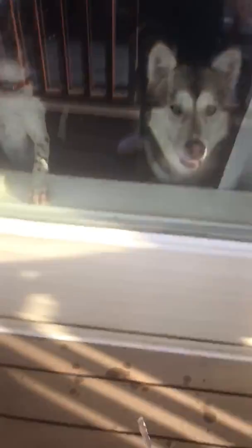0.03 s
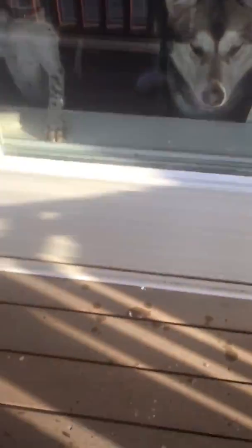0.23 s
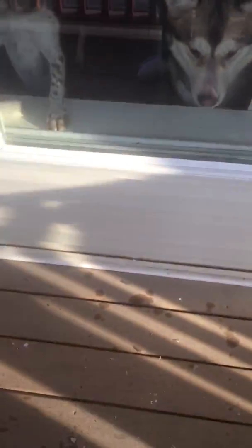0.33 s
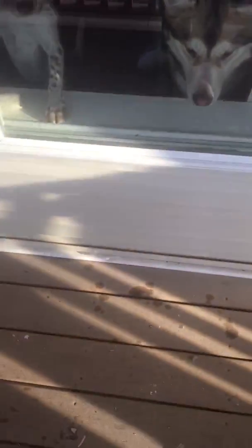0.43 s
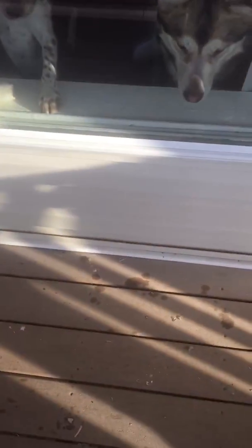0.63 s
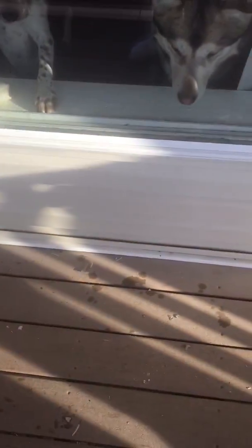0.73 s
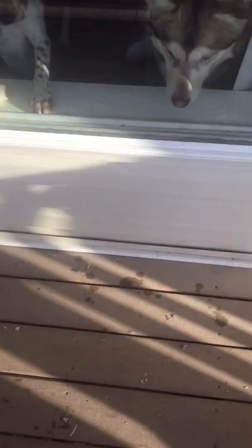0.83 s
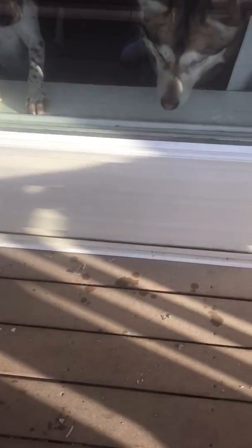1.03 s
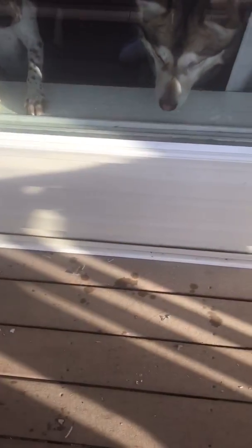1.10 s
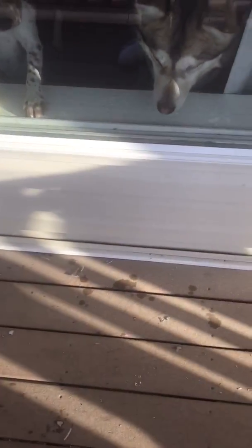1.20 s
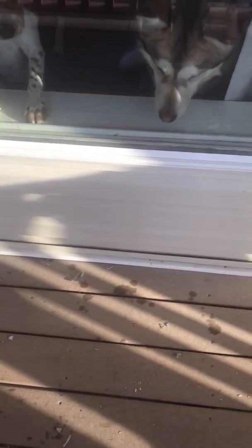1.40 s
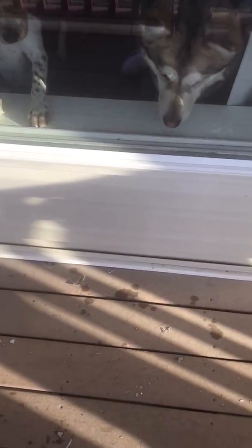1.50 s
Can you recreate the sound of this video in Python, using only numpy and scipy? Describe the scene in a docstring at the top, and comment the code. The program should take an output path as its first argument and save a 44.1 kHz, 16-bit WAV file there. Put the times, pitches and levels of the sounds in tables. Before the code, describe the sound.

An icicle hits a wooden deck and bursts in quick, sharp cracks as the boards thud. The biggest piece clinks, bounces and rolls to rest among skittering crumbs, heard close by in quiet outdoor air beside a house.

```python
"""On a wooden deck beside a house, an icicle hits the boards and bursts in a quick run of cracks.
The boards thud and tiny shards ping. The biggest piece lands again with a hollow clink, bounces
and rolls to rest among skittering crumbs. The boards and the house wall throw the sound of the ice
back over a quiet outdoor background with a few faint rustles."""
import sys
import numpy as np
from scipy import signal
from scipy.fft import rfft, irfft
from scipy.io import wavfile

SR = 44100
rng = np.random.default_rng(int(sys.argv[2]) if len(sys.argv) > 2 else 0)


def generate_wav(signal):
    """Clip the signal to [-1, 1] and save it as 16-bit WAV at the path in sys.argv[1]."""
    frames = np.transpose(np.atleast_2d(signal))
    scaled = np.clip(frames, -1, 1) * 32767
    pcm = np.round(scaled).astype(np.int16)
    wavfile.write(sys.argv[1], SR, pcm)


N = 68355
T = np.arange(N) / SR


def icicle_cracks():
    """Ice breaks on the boards: each blow is a sharp click and a short crunch, with its own tone."""
    # Each row: start in seconds, then level in dB in six bands (thud, knock, clack, crack, tick, fizz).
    blows = [ (0.2149, -28, -22.5, -26.5, -26.5, -28.5, -21),
             (0.2211, -32, -28.5, -34.5, -25, -30.5, -27.5), (0.2253, -33, -26, -28.5, -34, -25, -41),
             (0.2312, -40.5, -25, -52, -24, -46, -52), (0.249, -40.5, -40, -39, -29, -43, -45),
             (0.2582, -37, -50, -42, -35.5, -28.5, -25.5), (0.2649, -42, -29, -26, -32, -36, -39),
             (.2745, -38.5, -31.5, -30, -22.5, -27, -32.5), (0.2759, -45, -31, -33, -27, -28.5, -36.5),
             (0.2816, -35, -34.5, -31, -28, -34, -42), (0.293, -52.5, -49.5, -36, -44, -31.5, -41.5),
             (.3285, -42, -58, -47, -42, -49, -54), (0.344, -63.5, -53, -45, -38, -51.5, -51),
             (.3755, -43.5, -42.5, -44, -49, -51, -54.5), (0.3975, -42, -37.5, -36.5, -28, -29.5, -43.5),
             (0.405, -47, -46, -30, -47, -40, -51), (.4186, -32, -39, -39, -38.5, -31.5, -41.5),
             (.4722, -51, -56, -56, -47, -55, -60), (.4990, -59, -63, -63, -68, -52, -53.5),
             (.5238, -61, -75, -66, -52, -46.5, -55.5), (0.5775, -44, -29.5, -33.5, -48.5, -45.5, -58),
             (.5812, -53, -33, -46, -37, -53, -72), (0.5963, -44.5, -40, -50.5, -45, -52, -67),
             (0.6274, -52, -46, -37.5, -39.5, -53, -64), (.6470, -58, -56, -56, -55, -57.5, -74),
             (0.6683, -65, -63, -56, -55, -58, -69), (0.7258, -57.5, -54, -48.5, -46.5, -64, -80),
             (0.759, -55.5, -55, -62.5, -69, -70, -80.5), (.7930, -58.5, -60.5, -55.5, -63, -73, -78),
             (.8275, -62.5, -58, -58, -62, -77.5, -82), (0.8854, -59.5, -50.5, -64.5, -71, -80, -87)]
    # The borders of those six bands in Hz, from low to high.
    band_edges = [100, 550, 1400, 2500, 5000, 10000, 16000]
    edges = np.array(band_edges)
    centres = np.sqrt(edges[1:] * edges[:-1])
    blow_s, crunch_share = .005, .66  # the rest of a blow's energy goes into the click
    band_offset_db = 10 * np.log10(blow_s * SR * SR / 2 / np.diff(edges))  # spreads energy over each band
    cracks = 0
    for start, *levels in blows:
        contact = np.sqrt(crunch_share) * unit(rng.standard_normal(N) * fade(.019))
        contact[0] = np.sqrt(1 - crunch_share)
        db = np.array(levels) + band_offset_db
        thud = [(40, db[0] - 24), (110, db[0] - 11), (centres[0], db[0]), (500, db[0] - 1.5)]
        tone = [*thud, (660, db[1] - 3.5), *zip(centres[1:], db[1:])]
        cracks = cracks + at(through(contact, colour(tone)), start)
    return cracks


def big_piece_clinks():
    """The biggest piece rings each time it lands, more weakly each time; the second clink is dullest."""
    # Each row: start in seconds, strength in dB, pitch in Hz above which the ringing is weakened.
    landings = [(.4192, 1, 6000), (.5778, -15, 1000), (0.6271, -38, 5030)]
    # Each row: pitch in Hz, relative level in dB, fade time in seconds.
    notes = [(670, -36.5, .025), (857, -21, .022), (1050, -11.5, .012), (1150, -16, 0.025),
             (1197, -40.5, .12), (1830, -35.5, .11), (1900, -8.5, 0.016), (1953, -32.5, 0.12),
             (3010, -32.5, .12), (3148, -11, .013), (3265, -35.5, 0.098), (3985, -44, .14),
             (4200, -9, 0.0094), (6180, -16.5, 0.016)]
    rise = 1 - np.exp(-T / .00061)
    clinks = 0
    for start, strength, hardness_hz in landings:
        ringing = sum(ring(hz, db + strength, fade_s) / np.hypot(1, hz / hardness_hz)
                      for hz, db, fade_s in notes)
        clinks = clinks + at(ringing * rise, start)
    # The piece is too small to give off low notes.
    return signal.sosfilt(signal.butter(3, 560, "high", fs=SR, output="sos"), clinks)


def deck_thuds():
    """The boards take up the heavy blows and boom."""
    # Each row: pitch in Hz, relative level in dB, fade time in seconds.
    notes = [(78, -47, 0.1957), (156, -39.5, .3), (221.4, -36, .22), (277, -34, 0.22), (334, -33, .06),
             (400, -41, .15), (856, -37, .1), (995, -38, 0.17)]
    # Each row: start in seconds, strength in dB.
    blows = [(0.2163, 4.5), (0.4196, -14.5), (0.58, -15)]
    rise = 1 - np.exp(-T / .003)
    boom = sum(ring(*note) for note in notes) * rise
    return sum(at(amp(db) * boom, start) for start, db in blows)


def shard_pings():
    """Splinters give short, very high pings; being uneven, each rings at two close pitches."""
    # Each row: start in seconds, pitch in Hz, level in dB, fade time in seconds.
    pings = [(.2315, 12600, -11, 0.013), (.2590, 13000, -23, .012), (0.332, 12600, -43, .03),
             (0.377, 12360, -45, 0.045), (0.4341, 13950, -31.5, .025), (.6100, 13900, -53, 0.034),
             (.6490, 12900, -60, 0.037), (.7760, 14000, -62, .02)]
    twin_ratio, twin_db = 1.027, -8.5
    return sum(at(ring(hz, db, fade_s) + ring(hz * twin_ratio, db + twin_db, fade_s), start)
               for start, hz, db, fade_s in pings)


def crumb_spray():
    """A spray of ice crumbs ticks on the boards, ever weaker."""
    # Each row: time in seconds, level in dB.
    loudness = [(.222, -40), (.29, -46), (.32, -52.5), (.45, -61.5), (.55, -67), (.82, -68.5)]
    # Each row: frequency in Hz, relative level in dB.
    tone = [(1000, -11.5), (3000, -0.5), (6000, -1), (10000, -3), (13000, 2), (16000, -7.5)]
    flying = (T > .222) & (T < .83)
    ticks = patter(per_second=610, scatter_db=2) * level_curve(loudness) * flying
    return through(ticks, unit(colour(tone)))


def big_piece_roll():
    """The biggest piece rolls to rest in small dull bumps."""
    # Each row: frequency in Hz, relative level in dB.
    tone = [(120, -9), (300, 2), (1000, -1), (1900, -5), (3500, -22), (7000, -32), (16000, -50)]
    rolling = (T > .62) & (T < .9)
    bumps = patter(per_second=700, scatter_db=2) * rolling
    return amp(-59) * through(bumps, unit(colour(tone)))


def rustles():
    """A few faint, bright rustles, and a duller shuffle near the end."""
    # Each row: time of the peak in seconds, rough half-length in seconds, level in dB.
    bursts = [(0.983, .014, -75), (1.256, .01, -72.5), (1.281, .011, -66), (1.398, 0.013, -74.5),
              (1.475, 0.01, -66.5), (1.498, 0.02, -65.5)]
    # Each row: frequency in Hz, relative level in dB.
    rustle_tone = [(1000, -8), (4000, -6), (8000, 1), (10500, -4.5), (13000, 2.5), (16000, -6)]
    # Each row: time in seconds, level in dB.
    shuffle_loudness = [(1.3, -85), (1.38, -73.5), (1.402, -59), (1.43, -70.5), (1.48, -67), (1.55, -65)]
    # Each row: frequency in Hz, relative level in dB.
    shuffle_tone = [(60, 3), (150, -5.5), (600, 9), (1000, 5.5), (1800, 2), (4300, -6), (7000, -15),
                    (16000, -33)]
    rustle_level = sum(amp(db) * np.exp(-((T - peak) / width) ** 2) for peak, width, db in bursts)
    shuffle_level = level_curve(shuffle_loudness) * (T > shuffle_loudness[0][0])
    grains = patter(per_second=5000, scatter_db=4.5)
    bright = through(grains * rustle_level, unit(colour(rustle_tone)))
    dull = through(grains * shuffle_level, unit(colour(shuffle_tone)))
    return bright + dull


def add_echoes(sound):
    """The wall slaps the sound back; boards and wall add dense early echoes and a weak, longer tail."""
    # Each row: frequency in Hz, early level in dB, its fade in seconds, tail in dB, its fade in seconds.
    bands = [(200, -0.5, 0.11, -10, .7), (900, -5.5, 0.12, -18.5, 0.8), (1900, -5, .14, -17, 0.37),
             (3500, -7.5, 0.16, -20, 0.42), (7000, -11, .13, -21, .45), (13000, -10.5, 0.11, -22.5, .4)]
    wall_s, wall_db, first_echo_s = .012, -16.5, .005
    log_hz = np.log(np.maximum(np.arange(N // 2 + 1) * SR / N, 1))
    centres = np.log([row[0] for row in bands])
    early, tail = rfft(rng.standard_normal((2, N)))
    echoes = 0
    for pick, (_, early_db, early_s, tail_db, tail_s) in zip(np.eye(len(bands)), bands):
        band = np.interp(log_hz, centres, pick)  # one at this band, zero at its neighbours
        echoes = echoes + amp(early_db) * irfft(early * band, N) * unit(fade(early_s))
        echoes = echoes + amp(tail_db) * irfft(tail * band, N) * unit(fade(tail_s))
    return sound + amp(wall_db) * at(sound, wall_s) + at(through(sound, echoes), first_echo_s)


def outdoor_air():
    """A low, quiet outdoor rumble that swells and sinks a little."""
    # Each row: frequency in Hz, relative level in dB.
    tone = [(18, -28.5), (32, -11.5), (48, 0.5), (82, -14.5), (175, -8.5), (300, -9.5), (420, -10),
            (600, -16.5), (1070, -20), (1700, -28.5), (4000, -35.5), (12000, -40.5), (16000, -42.5)]
    level_db, swell_db = -61, 1.4
    swell = np.interp(T, np.linspace(0, T[-1], num=16), rng.standard_normal(16))
    response = unit(colour(tone, size=8192))
    noise = signal.fftconvolve(rng.standard_normal(N + len(response) - 1), response, "valid")
    return noise * amp(level_db + swell_db * swell)


def amp(db):
    """Turn decibels into a number to multiply by."""
    return 10 ** (np.asarray(db) / 20)


def level_curve(points):
    """A volume that glides between points given as seconds and dB."""
    return amp(np.interp(T, *np.array(points).T))


def fade(fade_s):
    """Die away by 60 dB over the fade time."""
    return np.exp(-np.log(1000) * T / max(fade_s, 1e-3))


def unit(sound):
    """Scale to an energy of one."""
    return sound / np.sqrt(np.sum(sound ** 2))


def at(sound, start):
    """Delay a sound by start seconds."""
    return np.concatenate([np.zeros(max(int(start * SR), 0)), sound])[:N]


def through(sound, response):
    """Give a sound the tone or echoes of a response."""
    return signal.fftconvolve(sound, response)[:N]


def colour(points, size=2048):
    """A click whose tone follows points given as Hz and dB."""
    hz, db = np.array(points, float).T
    freqs = np.maximum(np.arange(size // 2 + 1) * SR / size, 1)
    gains = amp(np.interp(np.log(freqs), np.log(hz), db))
    # These steps pack the click's energy at its start without changing its tone.
    cepstrum = irfft(np.log(gains))
    cepstrum[1:size // 2] *= 2
    cepstrum[size // 2 + 1:] = 0
    return irfft(np.exp(rfft(cepstrum)))


def ring(hz, db, fade_s):
    """One fading note of a struck object."""
    return amp(db) * fade(fade_s) * np.cos(2 * np.pi * hz * T)


def patter(per_second, scatter_db):
    """Random clicks of uneven size, with an average power of one."""
    clicks = (rng.random(N) < per_second / SR) * rng.choice([-1, 1], N)
    sizes = amp(scatter_db * np.clip(rng.standard_normal(N), -2, 2))
    return unit(clicks * sizes) * np.sqrt(N)


def scene():
    """The ice and its echoes, the booming boards and the background, in one channel."""
    ice = icicle_cracks() + big_piece_clinks() + shard_pings() + crumb_spray() + big_piece_roll()
    return (add_echoes(ice) + deck_thuds() + rustles() + outdoor_air())[None]


def record(dry):
    """Cut the very highest treble, above 16300 Hz."""
    return signal.sosfilt(signal.ellip(10, .2, 70, 16300, fs=SR, output="sos"), dry)


dry = scene()
out = record(dry)
generate_wav(out)
```